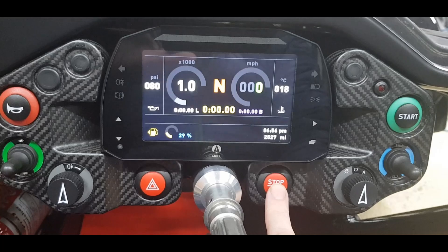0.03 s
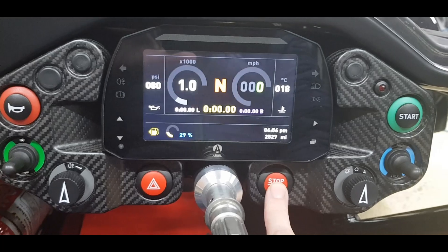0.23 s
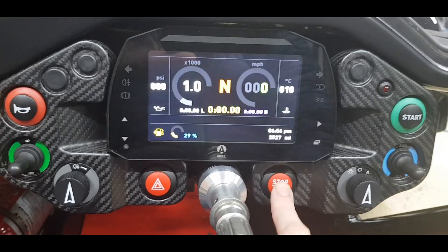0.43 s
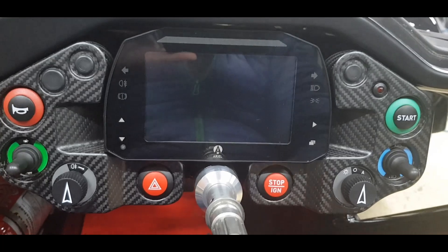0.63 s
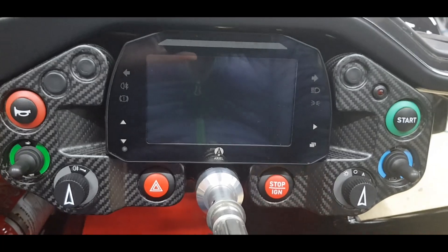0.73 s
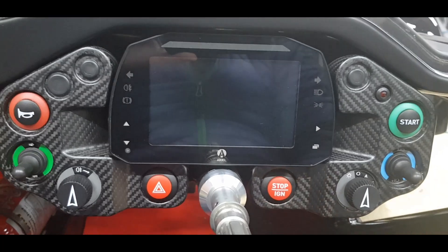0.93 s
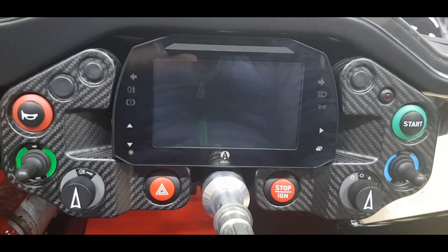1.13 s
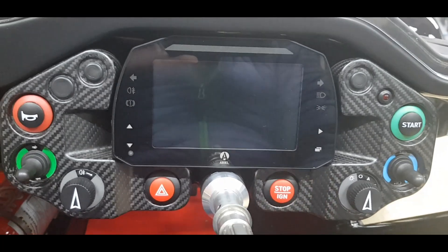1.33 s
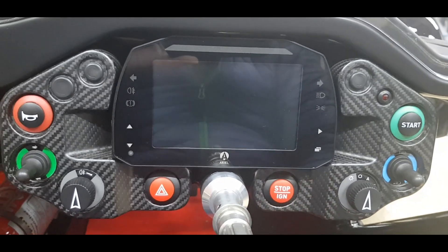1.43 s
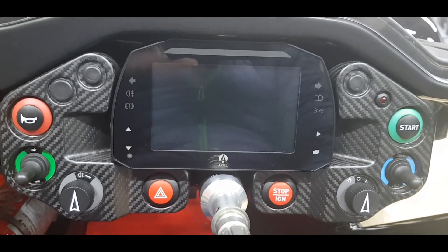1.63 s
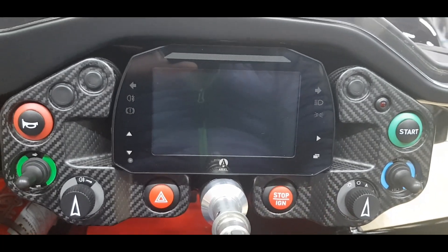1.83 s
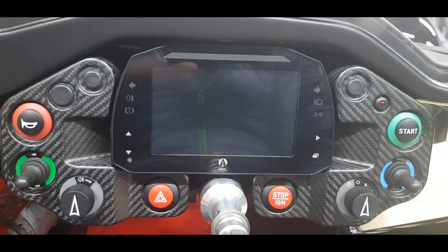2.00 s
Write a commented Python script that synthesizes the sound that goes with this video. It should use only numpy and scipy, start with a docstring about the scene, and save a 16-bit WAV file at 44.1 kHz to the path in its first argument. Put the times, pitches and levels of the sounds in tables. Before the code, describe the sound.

A car engine throbs evenly at idle, heard close from the driver's seat outdoors; ignition is cut, the pitch sinks with a low boom and shudder, slowing mechanical clatter thins out, then near silence.

```python
"""The steady throb of a four-cylinder car engine at idle is heard first, from the driver's seat outdoors.
The ignition is cut and the firing stops: pulses filtered by the exhaust give way to unfired strokes, whose
sinking overtones ring the pipe and body. A boom tracks the slowing crank, a shudder and a panel drone swell,
and gated noise for the valve gear thins to a few rasps. A faint low hum remains, fading in quiet air."""
import sys
import numpy as np
from scipy import signal
from scipy.fft import rfft, irfft
from scipy.io import wavfile

SR = 44100
rng = np.random.default_rng(int(sys.argv[2]) if len(sys.argv) > 2 else 0)


def bounce(signal):
    """Save signal as a 16-bit WAV file at the path given by the first command-line argument."""
    frames = np.transpose(np.atleast_2d(signal))
    limited = np.clip(frames, -1, 1)
    pcm = np.round(limited * 32767).astype(np.int16)
    wavfile.write(sys.argv[1], SR, pcm)


N = 91022
T = np.arange(N) / SR
CUT_S, CUT_FADE_S = 0.545, 0.017  # ignition cut, and the time constant of what dies with it
FLICKER_DB = 1  # rms chance level change of the noises, up to about 80 Hz


def amp(db):
    """Level law: decibels to amplitude gain."""
    return 10 ** (np.asarray(db) / 20)


def curve(points, column=1):
    """Linear interpolation: a control over time, its end values held."""
    points = np.array(points)
    return np.interp(T, points[:, 0], points[:, column])


def read(points, hz):
    """Linear interpolation of a spectrum on a logarithmic frequency axis."""
    f, value = np.transpose(points)
    return np.interp(np.log(hz + 1), np.log(f + 1), value)


def evened(x):
    """Normalization to unit rms."""
    return x / np.sqrt(np.mean(x ** 2) + 1e-20)


def pan(db):
    """Intensity stereo: left and right gains of mean 1 for a left-right level difference."""
    gains = amp([[db / 2], [-db / 2]])
    return gains / gains.mean()


def wander(hz):
    """Low-pass random modulation: Gaussian-filtered noise of unit rms, slower than about hz."""
    f = np.fft.rfftfreq(N, 1 / SR)
    lowpass = np.exp(-(f / hz) ** 2)
    return evened(irfft(rfft(rng.standard_normal(N)) * lowpass, N))


def sine(cycles):
    """Simple harmonic motion: a sine of unit rms whose phase is counted in cycles."""
    return np.sqrt(2) * np.sin(2 * np.pi * cycles)


# Likeness of the two channels: f/Hz, coherence (0 to 1)
COHERENCE = [(50, 0.83), (200, .93), (400, 0.2), (700, 0.14), (1200, 0.01), (15000, 0)]
CABIN_DB, CABIN_HZ = 3, 50.39  # strength and spacing of the cabin's narrow peaks and dips


def noise(spectrum, tilt_db=0):
    """Interchannel coherence: coloured noise, alike in the bass, wide and rippled by the cabin above."""
    hz = np.fft.rfftfreq(N, 1 / SR)
    a, b = rfft(rng.standard_normal((2, N)))
    same = np.clip(read(COHERENCE, hz), 0, 1)
    knots = rng.standard_normal((2, SR // 20))
    ripple = np.array([np.interp(hz / CABIN_HZ, np.arange(len(row)), row) for row in knots])
    colour_db = read(spectrum, hz) + tilt_db * np.log2(hz + 1)  # tilt in dB per octave
    colour_db = colour_db + CABIN_DB * (1 - same) * ripple
    right = same * a + np.sqrt(1 - same ** 2) * b
    x = irfft(np.array([a, right]) * amp(colour_db), N)
    return x / x.mean(0).std()


def ring(drive, modes):
    """Modal superposition: a drive convolved with steep-sided resonances, each placed left to right."""
    t = T[:SR // 2]
    response = 0
    for hz, db, t60, side in modes:
        # the factor t makes the onset gradual and the skirts steep
        mode = t * amp(-60 * t / t60) * np.sin(2 * np.pi * hz * t)
        response = response + pan(side) * amp(db) * evened(mode)
    return signal.oaconvolve(drive[None], response / np.sqrt(len(t)), axes=1)[:, :N]


# Crank speed: t/s, compression strokes per second
SPEED = [(0, 33), (.555, 33), (.6, 31), (.65, 28.5), (.735, 25.5), (.8, 23), (.9, 21), (1.0, 18.5),
         (1.1, 14), (1.25, 11), (1.45, 7), (1.85, 0.5)]
IDLE_RATE = SPEED[0][1]  # strokes per second
FIRST_STROKE_S = 0.002008


def crank():
    """Phase as the integral of rate: compression strokes counted from the first one."""
    return np.cumsum(curve(SPEED)) / SR - FIRST_STROKE_S * IDLE_RATE


def burning(fade_s):
    """Exponential decay: full until the ignition is cut, then dying with the given time constant."""
    return np.exp(-np.maximum(T - CUT_S, 0) / fade_s)


UNEVEN_DB, JITTER_DB = 0.2, 0.9  # peak difference between cylinders, rms chance from stroke to stroke


def strokes(turns, count=4):
    """Periodic impulse train: one impulse per stroke, the cylinders differing a little in strength."""
    at = np.flatnonzero(np.diff(np.floor(turns)) > 0)
    cylinder = np.cos(2 * np.pi * np.arange(len(at)) / count)
    train = np.zeros(N)
    train[at] = amp(UNEVEN_DB * cylinder + JITTER_DB * rng.standard_normal(len(at)))
    return train


# Exhaust harmonics at idle: multiple of the firing rate, relative level/dB
EXHAUST_NOTE = [(1, -16), (2, -2.5), (3, -5), (4, 0), (5, -12.5), (6, -6.5), (7, -27.5), (8, -29.5),
                (9, -15), (10, -29.5)]
EXHAUST_DB = -13.5  # mean rms of the channels while firing


def exhaust(turns, size=8192):
    """Source and filter: firing pulses excite the pipe, a minimum-phase filter that colours them."""
    harmonics = [(k * IDLE_RATE, db) for k, db in EXHAUST_NOTE]
    colour = [(26, -37)] + harmonics + [(450, -48.5), (900, -103)]
    log_gain = np.log(amp(read(colour, abs(np.fft.fftfreq(size, 1 / SR)))))
    # the Hilbert transform of the log gain supplies the minimum phase
    pipe = np.fft.ifft(np.exp(np.conj(signal.hilbert(log_gain)))).real[:size // 2]
    x = signal.oaconvolve(strokes(turns) * burning(CUT_FADE_S), pipe)[:N]
    return pan(2.55) * amp(EXHAUST_DB) * x / x[T < CUT_S].std()


# Block tones: multiple of the firing rate (played at the nearest half), level/dB, left-right/dB
BLOCK_TONES = [(11, -40.5, 4), (11.5, -40, 4), (12.5, -27.5, -6.5), (16, -41.5, -12.5), (20, -53, -4),
               (23, -51, 0), (23.5, -48, -10), (24, -49, 3), (34.32, -54.5, 5), (40.76, -53, 8)]
TONE_WAVER, TONE_FADE_S = 0.22, 0.081  # rms share of the amplitude, decay time constant after the cut


def block(turns):
    """Order excitation: wavering tones locked to the crank, decaying once the firing stops."""
    tones = 0
    for order, db, side in BLOCK_TONES:
        order = np.round(2 * order) / 2
        waver = 1 + TONE_WAVER * wander(8.8)
        tones = tones + pan(side) * amp(db) * waver * sine(order * turns + rng.random())
    return tones * burning(TONE_FADE_S)


# Resonances of exhaust and body: f/Hz, relative level/dB, t60/s, left-right/dB
BODY_MODES = [(84, -3, 0.061, 5.5), (104, 1, 0.06, 2.5), (129.5, -5, .06, -3.5), (169, -11.5, 0.075, 6),
              (252, -15, .08, 7), (351, -21.5, 0.071, 8), (394.6, -19, 0.089, -3), (510, -27.5, 0.14, -11),
              (760, -22, 0.03, -0.5)]
# Strength of the pumping strokes: t/s, drive level/dB
PUMP_LEVEL = [(0, -47), (.53, -39), (.6, -27.5), (.74, -27), (.8, -28.5), (.93, -35), (1.0, -31.5),
              (1.04, -36), (1.08, -36), (1.13, -42.5), (1.2, -50), (1.35, -50), (1.47, -62.5),
              (1.76, -59.5), (1.88, -71)]
PUMP_ROUGH, PUMP_WAVER = 0.51, 0.23  # noise rms in the drive, rms share of overtone amplitude


def pumping(turns, count=40):
    """Resonance: wavering overtones of unfired strokes sink through the modes of pipe and body."""
    overtones = 0
    for k in range(3, count):
        waver = 1 + PUMP_WAVER * wander(5.3)
        overtones = overtones + waver * np.cos(2 * np.pi * (k * turns + rng.random()))
    pulses = 2 * np.sqrt(curve(SPEED) / SR) * overtones * (T > CUT_S)
    drive = pulses + PUMP_ROUGH * rng.standard_normal(N)
    return ring(drive * amp(curve(PUMP_LEVEL)), BODY_MODES)


# Boom while coasting: t/s, level/dB
BOOM_LEVEL = [(.55, -35), (.572, -14), (.592, -14.5), (.62, -22.5), (.67, -13.5), (.73, -17.5), (.83, -16),
              (.91, -17), (.945, -34), (1.0, -50), (1.1, -78)]


def boom(turns):
    """Second-order tone: a low boom at twice the stroke rate sinks with the crank."""
    waver = 1 + 0.046 * wander(33)
    return pan(1.6) * amp(curve(BOOM_LEVEL)) * waver * sine(2 * turns) * (T > CUT_S)


# Shudder of the car on its springs and mounts: t/s, level/dB
SHUDDER_LEVEL = [(.9, -64), (.95, -40), (.985, -19.5), (1.03, -28), (1.08, -29), (1.16, -37), (1.25, -26),
                 (1.38, -36), (1.48, -41), (1.56, -46), (1.68, -54.5), (1.85, -61.5), (2.06, -77)]


def shudder():
    """Mass on springs: the car shudders on its springs and mounts at one fixed low pitch, 42.7 Hz."""
    waver = 1 + 0.45 * wander(14.3)
    return pan(1.6) * amp(curve(SHUDDER_LEVEL)) * waver * sine(42.7 * T)


# Panel drone, swelling as the sinking overtones cross its pitch: t/s, level/dB
DRONE_LEVEL = [(.58, -37), (.63, -30), (.665, -24), (.69, -43.5), (.715, -29), (.745, -24), (.775, -41),
               (.82, -38), (.89, -35.5), (1.0, -41.5), (1.04, -51.5), (1.1, -41.5), (1.2, -52), (1.36, -62),
               (1.48, -74.5), (1.6, -95)]
DRONE_REST_HZ, DRONE_PULL = 266.7, 0.5  # pitch with the crank at rest; Hz gained per stroke a second


def drone():
    """Sympathetic vibration: a panel hums with the coasting engine, its pitch sagging with the speed."""
    hz = DRONE_REST_HZ + DRONE_PULL * curve(SPEED) + 2.5 * wander(24.6)
    waver = 1 + 0.082 * wander(30)
    return amp(curve(DRONE_LEVEL)) * waver * sine(np.cumsum(hz) / SR)


# Mechanical noise: t/s, clatter level/dB, hiss level/dB
MECHANISM_LEVEL = [(0, -35, -44), (.58, -34, -44), (.73, -42.5, -47), (.95, -47, -54.5),
                   (1.06, -51.5, -63.5), (1.22, -54.5, -67), (1.38, -60.5, -69), (1.48, -66.5, -75.5),
                   (1.57, -67, -72), (1.7, -68.5, -78), (1.8, -74, -75), (1.89, -98, -92),
                   (2.06, -100, -97.5)]
# Spectrum of the clatter: f/Hz, relative level/dB
CLATTER_COLOUR = [(25, -19), (45, 5), (90, 6), (240, 5.5), (380, 0.5), (480, 3.5), (600, -8), (780, -1),
                  (970, -5.5), (1300, -2), (1650, -7.5), (2400, -7.5), (3200, -17.5), (8000, -40)]
# Spectrum of the hiss: f/Hz, relative level/dB
HISS_COLOUR = [(500, -40), (1800, -22.5), (2700, -4), (3200, -0.5), (3800, 3.5), (4900, -2.5), (6600, 0),
               (7400, -6), (8300, -12), (10000, -9.5), (12300, -5), (15500, -12.5)]
TICKS_PER_STROKE, TICK_DEPTH, TICK_DECAY = 4, 0.31, 0.75  # depth: mean gain added; decay in tick periods


def valve_train(turns):
    """Amplitude modulation: valve events of uneven strength pulse a clatter and, less deeply, a hiss."""
    beat = turns * TICKS_PER_STROKE
    strength = rng.exponential(1, N)[np.floor(beat).astype(int)]  # one draw per tick
    ticks = 1 + TICK_DEPTH * strength * np.exp(-(beat % 1) / TICK_DECAY)
    gate = evened(ticks * amp(FLICKER_DB * wander(80)))
    clatter = noise(CLATTER_COLOUR) * amp(curve(MECHANISM_LEVEL)) * gate
    hiss = noise(HISS_COLOUR) * amp(curve(MECHANISM_LEVEL, 2)) * evened(gate ** 0.56)
    return pan(2.3) * clatter + pan(-0.57) * hiss


# Air drawn through the intake while coasting: t/s, level/dB
INTAKE_LEVEL = [(.55, -52), (.7, -47.5), (.95, -50), (1.1, -58), (1.3, -61.5), (1.45, -65.5), (1.6, -83),
                (1.78, -82.5), (1.88, -100)]
# Spectrum of the intake: f/Hz, relative level/dB
INTAKE_COLOUR = [(300, -17), (800, 6.5), (1500, -8), (2000, 1), (2500, -0.5), (3050, -7.5), (3800, -10),
                 (4800, -14), (6500, -8.5), (8500, -25.5)]


def intake():
    """Flow noise: air drawn through the intake sighs as coloured noise."""
    return noise(INTAKE_COLOUR) * amp(curve(INTAKE_LEVEL) + FLICKER_DB * wander(80))


# Knocks: t/s, drive level/dB
KNOCK_TIMES = [(.561, -28), (.592, -35.5), (.742, -30), (1.151, -45)]
# Modes of the knocked panel: f/Hz, relative level/dB, t60/s, left-right/dB
PANEL_MODES = [(690, -11, 0.022, 6), (764, 1.5, 0.035, -5), (791, 0, 0.031, 0), (864, -9.5, .02, 4),
               (1144, -11.5, 0.016, 0)]


def knocks():
    """Impact excitation: short noise bursts ring a panel in a few sharp knocks."""
    drive = sum(amp(db) * (T >= s) * np.exp(-abs(T - s) / 0.005) for s, db in KNOCK_TIMES)
    return ring(drive * rng.standard_normal(N), PANEL_MODES)


# Modes of a loose shield: f/Hz, relative level/dB, t60/s, left-right/dB
SHIELD_MODES = [(791, -0.5, 0.046, -2.5), (1136, -9.5, 0.052, -2), (1242, -2, 0.019, 5),
                (1350, -3.5, 0.048, 5), (1970, -8.5, 0.04, 3)]
SHIELD_DB, SHIELD_FITS_DB = -49, 4  # drive level, depth of the fits per unit of chance


def shield():
    """Random excitation: thin metal shaken by the firing engine rattles in uneven fits."""
    fits = evened(amp(SHIELD_FITS_DB * np.clip(wander(40), -2, 2)))
    drive = amp(SHIELD_DB) * fits * burning(CUT_FADE_S) * rng.standard_normal(N)
    return ring(drive, SHIELD_MODES)


# Dry rasps of the last slow turns: t/s, level/dB, decay time constant/s, tilt/dB per octave
RASP_TIMES = [(1.158, -60, 0.024, -0.5), (1.252, -56, .035, 0), (1.294, -56, 0.0072, 0.5),
              (1.394, -57, 0.043, 0.5), (1.54, -62.5, 0.042, -0.5), (1.75, -69, 0.04, -1.5)]
# Spectrum of a rasp before tilt: f/Hz, relative level/dB
RASP_COLOUR = [(200, -13), (500, 10), (800, 0), (1500, 2), (2400, 3), (3200, -2), (5000, -6), (6700, 1),
               (8400, -11), (13000, -17), (16000, -26)]
RASP_RISE_S = 0.0074


def rasps():
    """Transient noise: dry bursts with a linear rise and exponential decay as the last strokes creep over."""
    total = 0
    for s, db, decay, tilt in RASP_TIMES:
        rise = np.clip((T - s) / RASP_RISE_S, 0, 1)
        fall = np.exp(-np.maximum(T - s - RASP_RISE_S, 0) / decay)
        total = total + noise(RASP_COLOUR, tilt) * amp(db) * rise * fall
    return total


# Low hum: f/Hz, level/dB
HUM_TONES = [(64.8, -41), (129.6, -67), (194, -71)]
HUM_FADE_FROM_S, HUM_FADE_DB_PER_S = 1.3, 9.5


def low_hum():
    """Additive synthesis: a few wavering low tones, fading linearly in decibels near the end."""
    hum = 0
    for hz, db in HUM_TONES:
        waver = 1 + 0.067 * wander(4.9)
        hum = hum + amp(db) * waver * sine(hz * T + rng.random())
    fade = amp(-HUM_FADE_DB_PER_S * np.maximum(T - HUM_FADE_FROM_S, 0))
    return pan(2.1) * hum * fade


# Spectrum of the quiet outdoor air: f/Hz, relative level/dB
AIR_COLOUR = [(20, -13), (60, 3.5), (110, -7.5), (250, -13), (500, -26), (1000, -43), (4000, -52.5),
              (15000, -46)]


def outdoor_air():
    """Stationary noise: quiet outdoor air at a constant -63 dB, strongest in the bass."""
    return amp(-63) * noise(AIR_COLOUR)


def scene():
    """Linear superposition: one turning crank phases the engine sounds, and all sources add."""
    turns = crank()
    engine = exhaust(turns) + block(turns) + pumping(turns) + boom(turns) + shudder() + drone()
    engine = engine + valve_train(turns) + intake()
    return engine + knocks() + shield() + rasps() + low_hum() + outdoor_air()


# Overall gain, with a brief dip in level: t/s, level/dB
LEVEL_DIP = [(1.475, -1), (1.495, -5.5), (1.506, -31), (1.524, -32), (1.535, -3.5), (1.546, 0.5)]
EDGE_HZ = 15750


def record(dry):
    """Gain and band limitation: the level dips briefly, then a linear-phase low-pass removes the top."""
    lowpass = signal.firwin(511, EDGE_HZ, window=("kaiser", 9), fs=SR)
    return signal.oaconvolve(dry * amp(curve(LEVEL_DIP)), lowpass[None], "same")


dry = scene()
out = record(dry)
bounce(out)
```